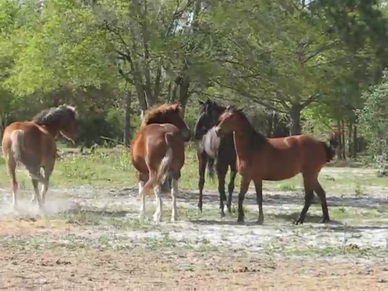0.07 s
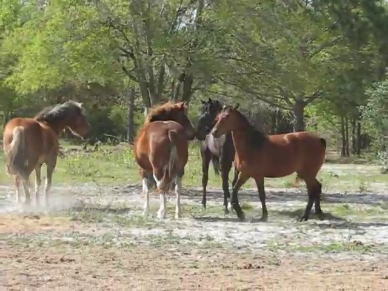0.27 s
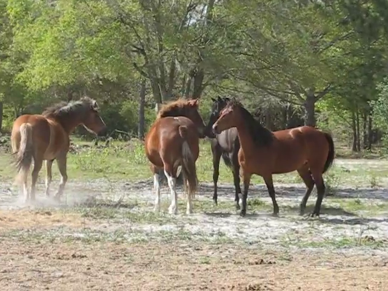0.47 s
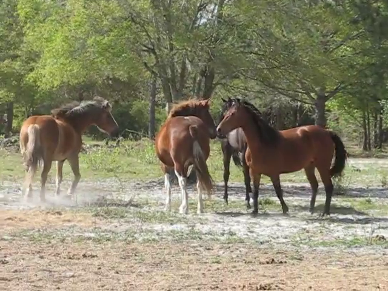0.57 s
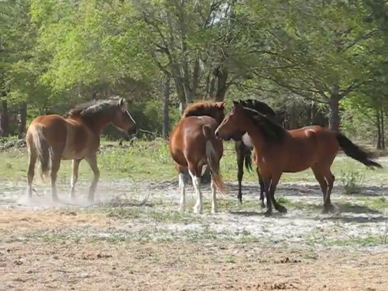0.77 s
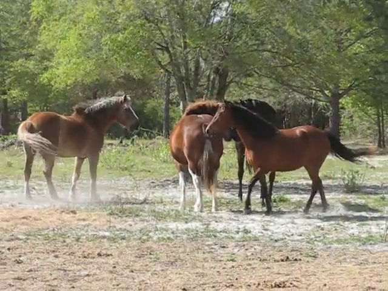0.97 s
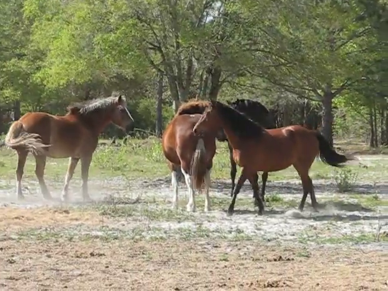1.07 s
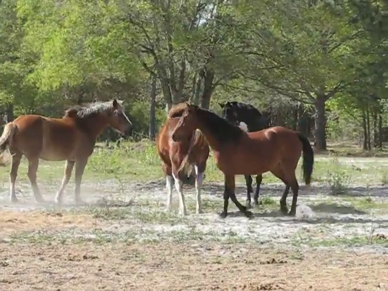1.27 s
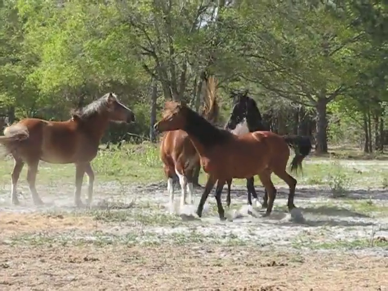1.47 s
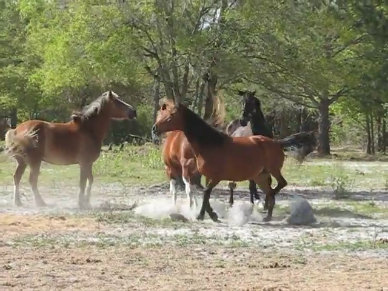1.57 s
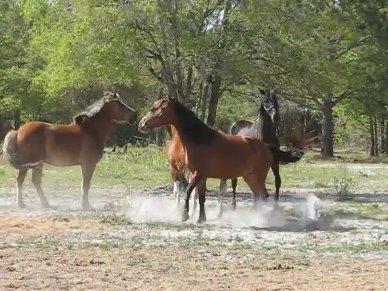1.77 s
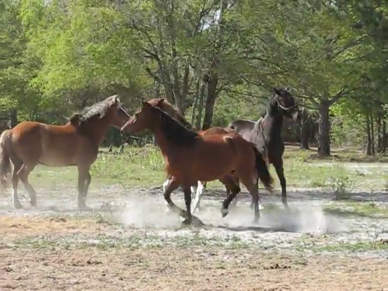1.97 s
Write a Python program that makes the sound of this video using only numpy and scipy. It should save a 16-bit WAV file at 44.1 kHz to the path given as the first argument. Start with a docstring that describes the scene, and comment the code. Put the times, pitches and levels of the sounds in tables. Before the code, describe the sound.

A horse squeals once, from about 1.27 to 1.85 seconds: shrill and raspy, rising quickly, holding with rough, breaking tones, then falling and stopping abruptly. Throughout, low wind rumbles and slaps the microphone, mostly on the right, heaviest after 0.5 seconds. Sandy hoof shuffling hisses around 0.5 to 0.9 seconds. Faint leaves, hiss, a thin high whine on the right and tiny ticks lie beneath.

```python
"""Horse squeal in a windy paddock

A horse squeals once: harmonics of a fast vocal oscillator, its tones with a slower one, rasp and ground echo.
Wind buffets two microphone ports separately: shaped low noise plus short pressure slaps.
Sand hisses under hooves as dense grains; leaves and microphone hiss are filtered noise.
A thin whine of two wandering sines sits on the right; a few faint noise ticks mark the treble."""
import sys
import numpy as np
from scipy import signal
from scipy.fft import rfft, irfft
from scipy.io import wavfile

SR = 44100
rng = np.random.default_rng(int(sys.argv[2]) if len(sys.argv) > 2 else 0)


def digitize_waveform(pressure):
    """Quantize a signal to 16-bit integers and store it at the path in sys.argv[1].

    Rows of a 2-D input are taken as channels; values are limited to [-1, 1].
    """
    field = np.atleast_2d(pressure).T
    bounded = np.clip(field, -1, 1)
    quanta = np.round(bounded * 32767).astype(np.int16)
    wavfile.write(sys.argv[1], SR, quanta)


def elevation(decibels):
    """Turn decibel levels (scalar or array-like) into linear amplitude ratios."""
    levels = np.asarray(decibels, float)
    return 10 ** (levels / 20)


N = 88552

# strongest wind buffets: (time [s], level before a fixed lift [dB], port [0 left, 1 right, else nearest])
BUFFETS = [(0.331, -16.5, 1), (0.603, -9, 0.88), (0.621, -9, 1), (0.851, -5, 0.2), (0.888, -13, 0.96),
           (0.926, -10.5, 0), (1.028, -13, 1), (1.082, -6.5, 1), (1.121, -33, 0.84), (1.148, -16.5, 0.77),
           (1.258, -20.5, 0.047), (1.337, -12.5, 0.57), (1.439, -5, 0), (1.502, -12.5, 0.16),
           (1.533, -11, 1), (1.656, -5.5, 1), (1.756, -4, 1), (1.845, -12, 1)]


def unit(x):
    """Scale to rms 1."""
    return x / np.sqrt(np.mean(np.abs(x) ** 2) + 1e-20)


def in_time(rows):
    """Interpolate each column after the time column at every sample."""
    s, *cols = np.transpose(rows)
    return [np.interp(np.arange(N) / SR, s, c) for c in cols]


def at_hz(rows, hz, axis=1):
    """Interpolate one column over log frequency."""
    return np.interp(np.log(hz), np.log(np.array(rows)[:, 0]), np.array(rows)[:, axis])


def drift(rate_hz):
    """Slow random signal of rms 1: noise through a double pole at rate_hz, made at SR / 8."""
    r = np.exp(-16 * np.pi * rate_hz / SR)
    white = rng.standard_normal(N // 8 + 4002)
    slow = signal.lfilter([1], [1, -2 * r, r * r], white)[4000:]  # skip the filter's start
    return np.interp(np.arange(N) / 8, np.arange(len(slow)), unit(slow))


def band(x, low_hz, high_hz):
    """Butterworth band-pass."""
    return signal.sosfilt(signal.butter(2, [low_hz, high_hz], "band", fs=SR, output="sos"), x)


def shaped(x, gain):
    """Filter by a gain given as a function of frequency."""
    return irfft(rfft(x) * gain(np.maximum(np.fft.rfftfreq(N, 1 / SR), 1)), N)


def partial(phase, rough):
    """A sine whose rough share breaks up and is smeared into a narrow noise band with wide skirts."""
    near_hz, wide_hz, wide_share = 70, 350, .3
    break_db, break_hz = 8, 35
    rough = np.clip(rough, 0, .95)
    near, wide = (drift(hz) + 1j * drift(hz) for hz in (near_hz, wide_hz))
    smear = (np.sqrt(1 - wide_share) * near + np.sqrt(wide_share) * wide) / np.sqrt(2)
    breaks = elevation(break_db * rough * np.tanh(drift(break_hz)))
    envelope = np.sqrt(1 - rough) + np.sqrt(rough) * smear
    return np.sqrt(2) * breaks * np.real(envelope * np.exp(1j * phase))


def oscillators():
    """Harmonics of the fast oscillator, and its difference and sum tones with the slow one."""
    # fast: (time [s], pitch [Hz], harmonics 1, 2, 3 [dB], roughness [0-1])
    fast_track = [(1.274, 1340, -41, -56, -67, 0.63), (1.297, 1504, -44.5, -45, -64, 0.83),
                  (1.318, 1770, -41, -39.5, -73, 0.58), (1.356, 1880, -37.5, -43, -49, 0.77),
                  (1.378, 2040, -37.5, -32, -45.5, 0.3), (1.409, 2104, -47, -39, -49, 0.39),
                  (1.462, 2080, -50, -39, -50, 0.51), (1.491, 2155, -36.5, -44, -50, 0.22),
                  (1.528, 2222, -57, -34, -44.5, 0.068), (1.577, 2157, -44, -41, -58, 0.6),
                  (1.617, 2185, -43, -50, -39.5, 0.53), (1.661, 2133, -57, -32.5, -39.5, .3),
                  (1.684, 2007, -27, -33.5, -37, .15), (1.709, 1972, -30.5, -36.5, -34, 0.05),
                  (1.736, 1925, -38, -47, -54, .3), (1.776, 1893, -46, -59, -53, 0.13),
                  (1.81, 1836, -30.5, -44, -70, 0.056), (1.831, 1532, -38, -39.5, -56, 0.22),
                  (1.85, 1232, -43, -41, -66, 0.25)]
    # slow: (time [s], pitch [Hz], difference tones under harmonics 1, 2 [dB])
    slow_track = [(1.36, 500, -58, -68), (1.39, 571.4, -43.5, -60), (1.44, 691, -59, -61),
                  (1.51, 780, -33, -45.5), (1.56, 796, -41, -40.5), (1.6, 810.4, -48, -49.5),
                  (1.64, 777, -48, -42), (1.668, 710.6, -40, -38), (1.71, 640, -84, -58)]
    # harmonics 4-6: (level relative to harmonic 3 [dB])
    top_db = [-7.5, -36, -34]
    third_tone_db, sum_tone_db = -12, -11  # relative to the second difference tone
    wobble_hz, wobble_share = 60, .004
    jitter_hz, jitter_share = 250, .018  # share of pitch at full roughness
    rougher_per_harmonic, tone_rough = .3, .4

    hz, *levels, rough = in_time(fast_track)
    rough = np.clip(rough, 0, 1)
    wobble = wobble_share * drift(wobble_hz)
    jitter = jitter_share * rough ** 2 * drift(jitter_hz)
    fast = 2 * np.pi * np.cumsum(hz * (1 + wobble + jitter)) / SR
    slow_hz, *tones = in_time(slow_track)
    slow = 2 * np.pi * np.cumsum(slow_hz) / SR

    voice = np.zeros(N)
    for k, db in enumerate(levels + [levels[-1] + d for d in top_db]):
        voice += elevation(db) * partial((k + 1) * fast, rough * (1 + rougher_per_harmonic * k))
    for k, db in enumerate(tones + [tones[-1] + third_tone_db]):
        voice += elevation(db) * partial((k + 1) * fast - slow, tone_rough)
    for k in (2, 3):
        voice += elevation(tones[-1] + sum_tone_db) * partial(k * fast + slow, tone_rough)
    start_s, end_s = fast_track[0][0], fast_track[-1][0]
    return voice, start_s, end_s


def rasp():
    """The voice breaking into noise: white noise through throat resonances."""
    # (time [s], level [dB])
    rasp_db = [(1.26, -55), (1.36, -49.5), (1.515, -46), (1.57, -43), (1.63, -40.5), (1.72, -56)]
    # resonances: (centre [Hz], width [Hz], relative gain [dB])
    throat = [(1670, 320, -2), (2330, 280, 2), (2950, 470, 3), (4150, 570, 4), (6600, 1400, -1.5)]
    flicker_db, flicker_hz = 2.4, 24

    def resonances(f):
        return sum(elevation(db) / (1 + ((f - c) / w * 2) ** 2) for c, w, db in throat)

    noise = unit(shaped(rng.standard_normal(N), resonances))
    return elevation(in_time(rasp_db)[0] + flicker_db * drift(flicker_hz)) * noise


def squeal():
    """Oscillators and rasp, gated, panned by frequency, plus the ground echo."""
    # left minus right: (frequency [Hz], difference [dB])
    pan = [(1800, -1), (4200, 7.5), (8400, -3.5)]
    # ground echo: (left lag [s], right lag [s], level relative to voice [dB])
    echoes = [(.004, 0.0055, -10.5)]
    fade_s = 0.002
    voice, start_s, end_s = oscillators()
    t = np.arange(N) / SR
    gate = np.clip(np.minimum(t - start_s, end_s - t) / fade_s, 0, 1)
    voice = gate * (voice + rasp())
    out = np.array([shaped(voice, lambda f: elevation(side * at_hz(pan, f) / 2)) for side in (1, -1)])
    for *lags_s, db in echoes:
        for port, lag_s in enumerate(lags_s):
            out[port] += elevation(db) * np.roll(voice, int(lag_s * SR))
    return out


def gusts():
    """Eddies per port: lumpy low noise, brighter as it swells; swells at buffets whose port is exactly 0 or 1."""
    # (time [s], left level [dB], right level [dB])
    gust_track = [(0, -30, -13), (0.097, -32, -23), (0.198, -34, -16.5), (.34, -25, -25), (.42, -40, -24.5),
                  (.49, -35, -25), (.55, -19.5, -19), (.63, -18.5, -21.5), (.77, -19, -11.5),
                  (0.817, -26, -18.5), (.88, -20, -11), (1.0, -17.5, -13.5), (1.2, -22, -16.5),
                  (1.363, -29.5, -19), (1.438, -16, -10), (1.54, -27.5, -13), (1.68, -27, -11),
                  (1.76, -29, -11), (1.88, -30, -16.5), (2.01, -34, -14)]
    # colour at mean strength: (frequency [Hz], relative density [dB per Hz])
    wind_colour = [(20, -0.5), (50, -2), (110, 6.5), (180, -2), (300, -7), (500, -29.5), (800, -47.5),
                   (1600, -60)]
    lump_db, lump_hz = 3.6, 24
    swell_db, swell_s = 4, .016
    brighten_per_oct, pivot_hz = 0.24, 120  # dB per octave from the pivot, per dB of swell
    own_db, own_hz = 1.4, 35.0  # each band's own flicker
    t = np.arange(N) / SR
    edges_hz = 20 * 2 ** np.arange(0, 6.6, .5)
    mean_db = np.mean(np.array(gust_track)[:, 1:])
    out = np.zeros((2, N))
    for port, gust_db in enumerate(in_time(gust_track)):
        lumps = lump_db * np.tanh(drift(lump_hz))
        for s, _, side in BUFFETS:
            if side == port:
                lumps += swell_db * np.exp(-((t - s) / swell_s) ** 2)
        swell = gust_db - mean_db + lumps
        white = rng.standard_normal((2, N + SR // 2))  # adjacent bands use different noise
        for k, (low_hz, high_hz) in enumerate(zip(edges_hz, edges_hz[1:])):
            hz = np.sqrt(low_hz * high_hz)
            tilt = brighten_per_oct * np.log2(hz / pivot_hz) * swell
            gain_db = at_hz(wind_colour, hz) + tilt + lumps + own_db * drift(own_hz)
            out[port] += band(white[k % 2], low_hz, high_hz)[-N:] * elevation(gain_db)
        out[port] = unit(out[port]) * elevation(gust_db)
    return out


def buffets():
    """Pressure slaps on one port: short Gaussian tone bursts of random pitch and phase, with a sharp edge."""
    base_hz, width_cycles, lift_db = 177.7, 1.09, 8.5
    edge_s, edge_db, edge_follows = .0004, -2, .5  # edge_follows: edge dB per buffet dB
    t = np.arange(-1500, 1500) / SR
    edge = band(np.exp(-(t / edge_s) ** 2), 190, 940)
    out = np.zeros((2, N))
    for s, db, port in BUFFETS:
        hz = base_hz * (0.74 + .5 * rng.random())
        burst = np.exp(-(t * hz / width_cycles * 2) ** 2) * np.cos(2 * np.pi * (hz * t + rng.random()))
        slap = elevation(db + lift_db) * burst + elevation(edge_db + edge_follows * db) * edge
        i = int(s * SR) - len(t) // 2
        out[int(port > .5), i:i + len(t)] += slap[:N - i]
    return out


def sand():
    """Sand shuffled by hooves: dense grains, part shared by the ports and reaching the right one first."""
    # (time [s], level [dB])
    sand_db = [(0, -46), (.12, -41), (.42, -56), (.46, -39.5), (.54, -33.5), (.75, -36), (.82, -35),
               (.89, -44), (1.15, -64), (2.01, -48)]
    # (frequency [Hz], relative density [dB per Hz])
    sand_colour = [(1800, -3.5), (2500, -1.5), (3300, -0.5), (4300, -3.5), (5000, -11.5), (6500, -17),
                   (8000, -14.5), (9800, -51)]
    shared_power, lag_s, grains_per_s = 0.66, 0.00014, 12000
    flicker_db, flicker_hz = 1.3, 9
    grains = rng.standard_normal((3, N)) * (rng.random(N) < grains_per_s / SR)
    level = elevation(in_time(sand_db)[0] + flicker_db * drift(flicker_hz))
    near, left, right = (level * unit(shaped(g, lambda f: elevation(at_hz(sand_colour, f)))) for g in grains)
    late = shaped(near, lambda f: np.exp(-2j * np.pi * f * lag_s))
    shared = np.sqrt(shared_power) * np.array([late, near])
    own = np.sqrt(1 - shared_power) * np.array([left, right]) * elevation([[1.5], [-1.5]])
    return shared + own


def whine():
    """Two sines on the right port, each wandering in pitch."""
    # (frequency [Hz], level [dB])
    whine_lines = [(8253, -57.5), (8280, -59)]
    wander_hz, wander_rate_hz = 9.65, 7.2
    out = np.zeros((2, N))
    for hz, db in whine_lines:
        phase = 2 * np.pi * np.cumsum(hz + wander_hz * drift(wander_rate_hz)) / SR
        out[1] += elevation(db) * np.sqrt(2) * np.sin(phase)
    return out


def ticks():
    """Faint treble ticks: band-passed noise with exponential decay."""
    # (time [s], level before decay [dB])
    tick_list = [(.115, -45), (.665, -41), (1.508, -44), (1.572, -43)]
    low_hz, high_hz, decay_s = 5000, 14000, .0015
    t = np.arange(400) / SR
    out = np.zeros((2, N))
    for s, db in tick_list:
        tick = unit(band(rng.standard_normal((2, len(t))), low_hz, high_hz)) * np.exp(-t / decay_s)
        i = int(s * SR)
        out[:, i:i + len(t)] += tick * elevation(db)
    return out


def leaves_and_hiss():
    """Far leaves and microphone hiss: noise partly shared by the ports, with flickering treble."""
    # (frequency [Hz], left relative density [dB per Hz], right relative density [dB per Hz])
    hiss_colour = [(397, -3, -10), (843, -0.5, 0), (1380, -7, -8), (2520, -11.5, -8.5), (4540, -14.5, -18),
                   (8400, -19, -11.5), (9840, -31.5, -22), (12000, -23.5, -27.5), (16000, -36, -36)]
    # (time [s], level [dB])
    hiss_db = [(0, -38), (1.15, -44), (1.6, -42), (2.01, -42)]
    # power shared by the ports: (frequency [Hz], share [0-1])
    likeness = [(1100, 0.93), (3500, 0.15), (9000, 0.1)]
    low_hz, treble_hz, flicker_db, flicker_hz = 300, 9000, 1.1, 9
    both, *own = rng.standard_normal((3, N))
    hiss = np.zeros((2, N))
    for port in range(2):
        def colour(f):
            return elevation(at_hz(hiss_colour, f, axis=port + 1)) * (f > low_hz)

        hiss[port] = shaped(both, lambda f: np.sqrt(at_hz(likeness, f)) * colour(f))
        hiss[port] += shaped(own[port], lambda f: np.sqrt(1 - at_hz(likeness, f)) * colour(f))
    hiss = unit(hiss)
    treble = np.array([shaped(h, lambda f: f > treble_hz) for h in hiss])
    flicker = elevation(flicker_db * drift(flicker_hz))
    return (hiss + treble * (flicker - 1)) * elevation(in_time(hiss_db)[0])


def scene():
    """Sum of all sources."""
    return squeal() + gusts() + buffets() + sand() + whine() + ticks() + leaves_and_hiss()


def roll_off(x):
    """The treble ends steeply here."""
    return signal.sosfilt(signal.butter(12, 15790, fs=SR, output="sos"), x)


def record(dry):
    """Peaks are rounded by a tanh."""
    mix = np.tanh(dry / 1.045)
    return roll_off(mix)


dry = scene()
out = record(dry)
digitize_waveform(out)
```